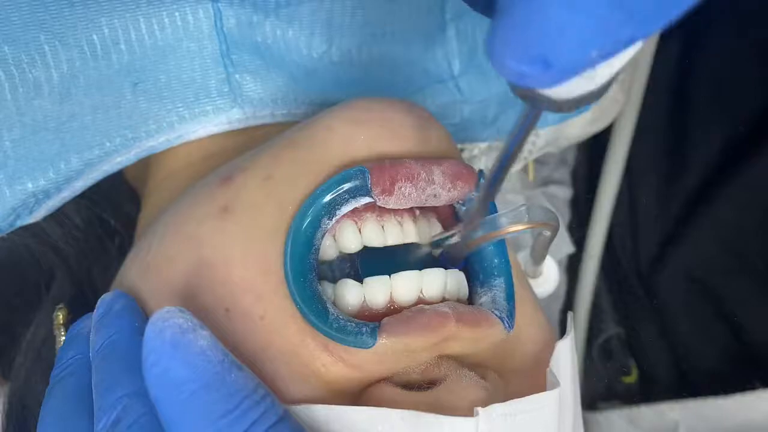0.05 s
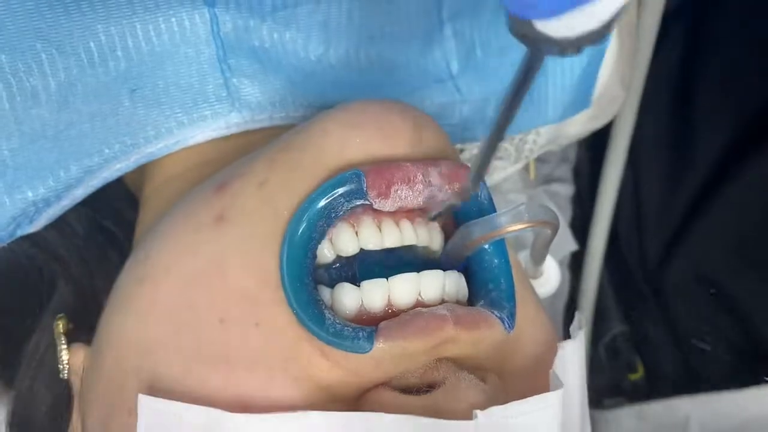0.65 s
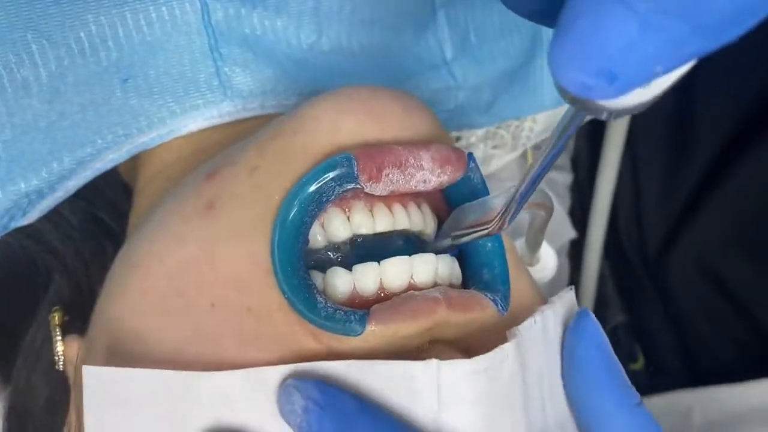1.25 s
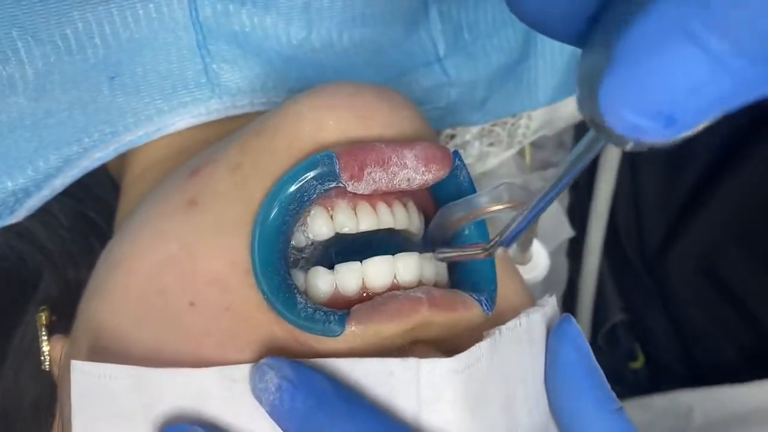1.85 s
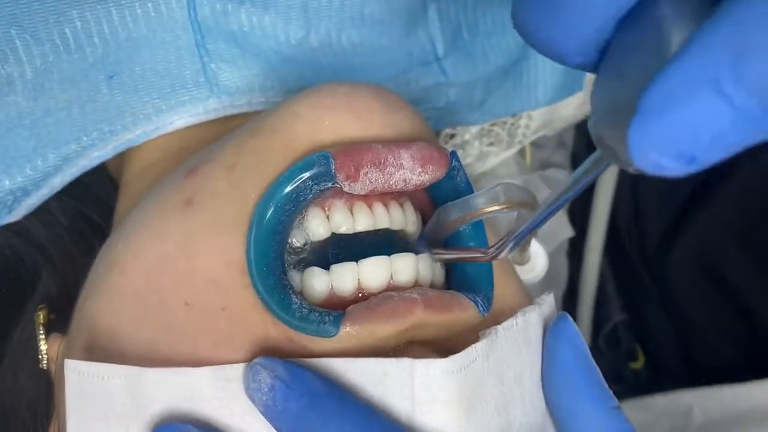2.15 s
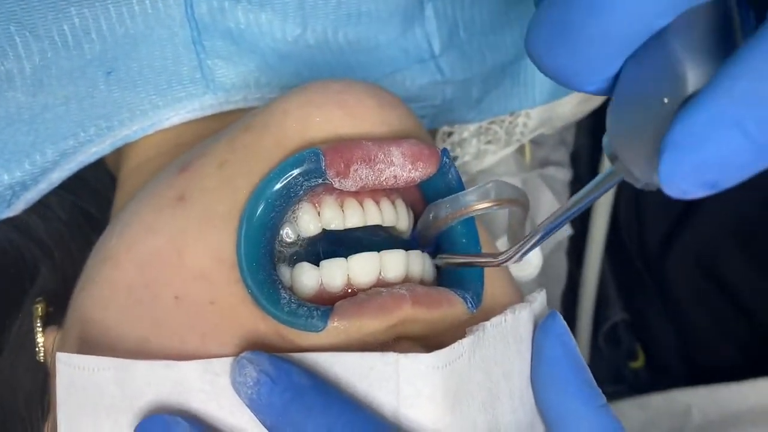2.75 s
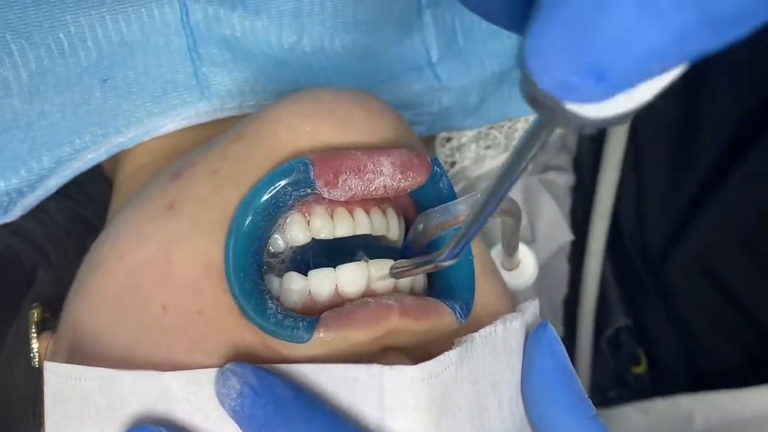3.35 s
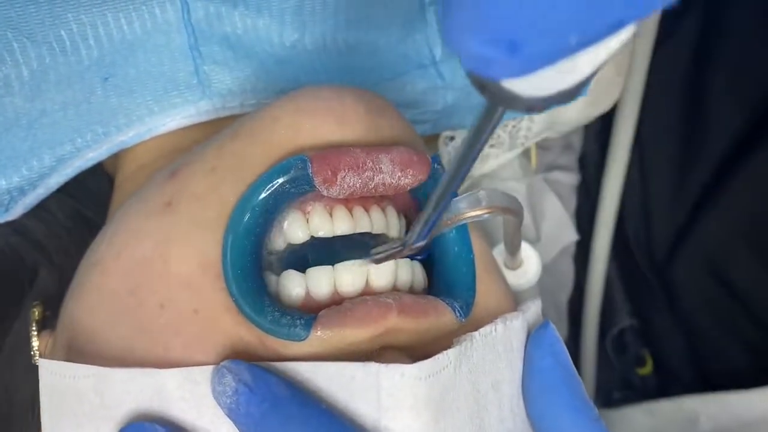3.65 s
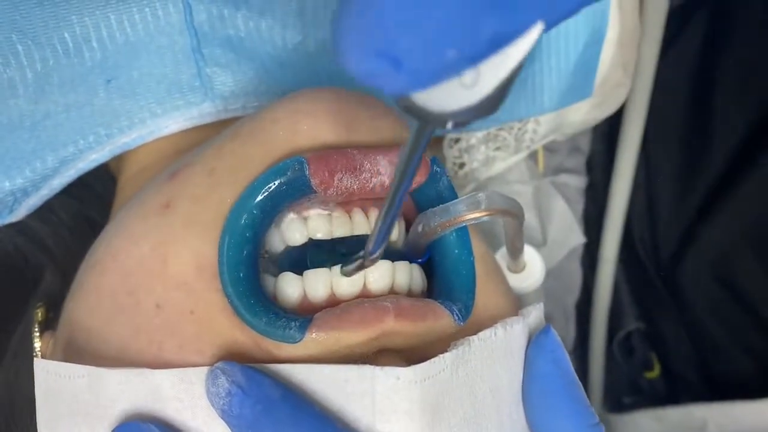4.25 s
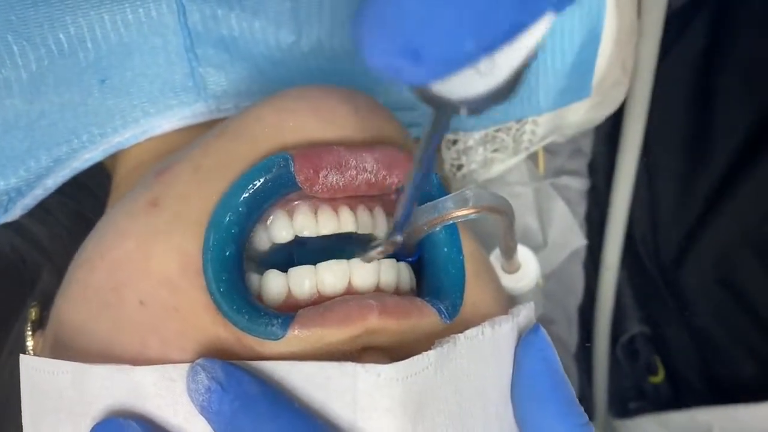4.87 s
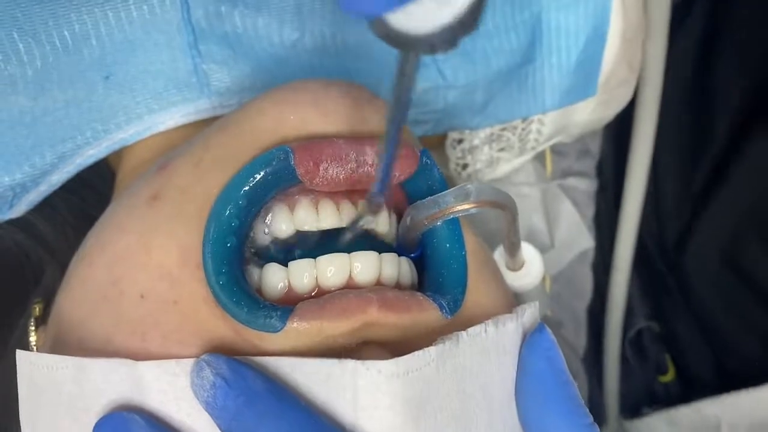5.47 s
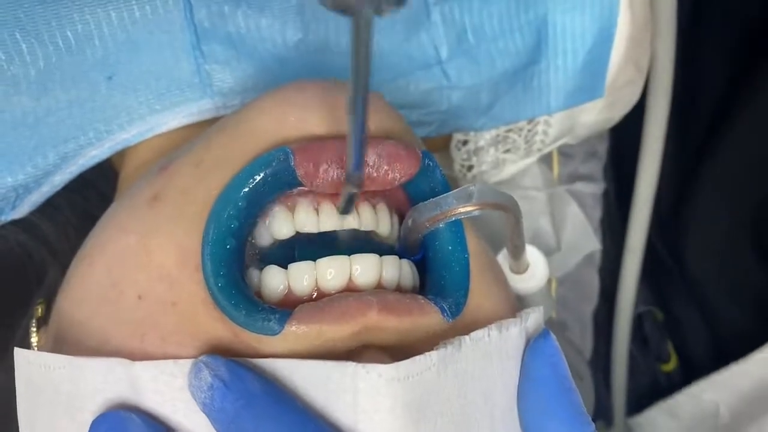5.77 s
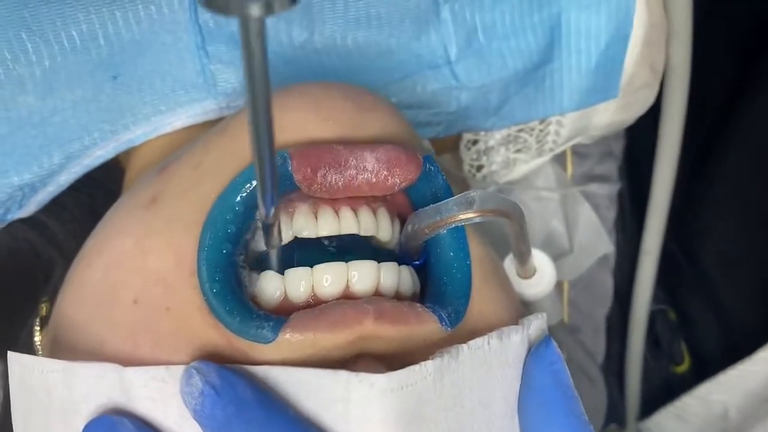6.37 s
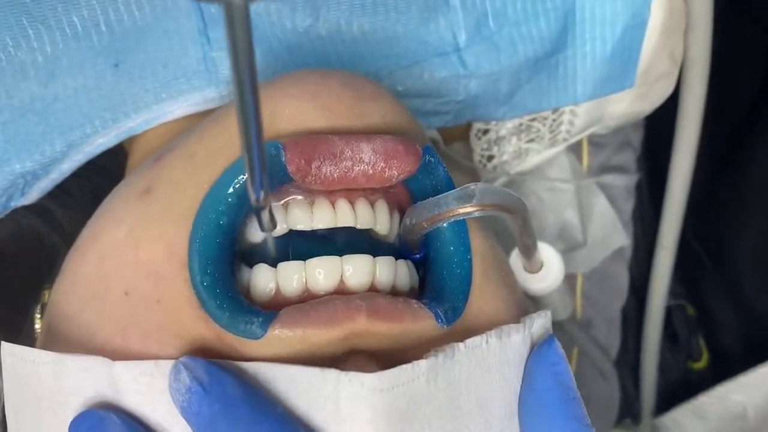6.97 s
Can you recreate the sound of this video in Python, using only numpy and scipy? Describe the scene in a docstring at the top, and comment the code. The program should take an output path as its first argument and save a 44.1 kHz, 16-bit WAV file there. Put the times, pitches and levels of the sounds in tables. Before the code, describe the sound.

Close, wet hissing and slurping of dental suction in an open mouth, with little spits and a low hum beneath.

```python
"""A hollow, watery rush is heard first: a dental suction tube slurps air and saliva in an open mouth,
close to a pair of microphones. Turbulent flow excites the resonances of mouth and tube; it dips as
liquid chokes the tip, swells as the tip draws freely, and pops and spits as slugs go through.
Beneath it a motor hums at harmonics of its shaft speed, over the low rumble of a quiet treatment room."""
import sys
import numpy as np
from scipy import signal
from scipy.fft import rfft, irfft
from scipy.io import wavfile
from scipy.ndimage import uniform_filter1d, minimum_filter1d

SR = 44100
rng = np.random.default_rng(int(sys.argv[2]) if len(sys.argv) > 2 else 0)


def generate_wav(signal):
    """Clip the signal to [-1, 1] and save it as 16-bit WAV at the path in sys.argv[1]."""
    frames = np.transpose(np.atleast_2d(signal))
    scaled = np.clip(frames, -1, 1) * 32767
    pcm = np.round(scaled).astype(np.int16)
    wavfile.write(sys.argv[1], SR, pcm)


N = 318402
T = np.arange(N) / SR
HZ = np.fft.rfftfreq(N, 1 / SR)

# Modes of mouth and tube, in the order deep, low, main, high, tip:
# (frequency [Hz], half-width [Hz], gain [dB])
CAVITY_MODES = [(1374, 107, -0.3), (1861, 305, -2), (2623, 406, -2.5), (3210, 470, -0.5), (5330, 1500, 0)]
# How strongly droplets and gulps shake each mode: (weight [ratio])
MODE_WETNESS = (1.5, 1.08, 0.82, 0.75, 0.32)
# How deeply the liquid film flutters each mode: (depth [dB])
MODE_FLUTTER = (2.2, 2.3, 1.0, 1.1, 0.3)
# How far each mode follows a squelch: (share [0-1])
MODE_SQUELCH = (1, 0.94, 0.6, 0.32, 0.2)
# Drive of the deep mode, at the back of the mouth: (time [s], level [dB])
DEEP_DRIVE = [(0.2, -43), (1.15, -45), (2.6, -40), (4.0, -41), (5.2, -35), (5.75, -30), (6.4, -36),
              (7.21, -31.5)]
# Strength of the suction as the tip is moved about: (time [s], level [dB])
SUCTION_DRIVE = [(0.19, -19), (0.57, -24), (0.85, -16), (1.15, -18), (1.9, -22.5), (2.42, -22.5),
                 (2.85, -23), (3.3, -20), (3.55, -18), (4.4, -20.5), (4.9, -17), (5.35, -17.5),
                 (5.63, -11.5), (6.25, -15), (6.55, -23.5), (6.85, -17.5), (7.21, -17)]
# Drive of the treble modes: (time [s], high mode level [dB], tip mode level [dB])
TREBLE_DRIVE = [(0.2, -50, -32.5), (0.45, -25.5, -37.5), (0.75, -22, -29), (1.05, -21.5, -33.5),
                (1.3, -38, -35), (1.55, -27.5, -39), (2.55, -24, -35), (2.85, -27.5, -39.5),
                (3.25, -21.5, -33.5), (3.55, -26.5, -41.5), (4.3, -31, -37.5), (4.95, -31.5, -33.5),
                (5.55, -33, -42.5), (6.25, -26, -35), (6.7, -26.5, -45), (7.0, -24.5, -68),
                (7.21, -16.5, -43)]
# Drive of the air hiss: (time [s], level [dB])
HISS_DRIVE = [(0.19, -32), (0.65, -31), (1.4, -36), (2.4, -36.5), (3.85, -37.5), (4.85, -34), (5.4, -35),
              (5.7, -29.5), (5.9, -33.5), (6.15, -31), (6.6, -36), (7.0, -32), (7.21, -35.5)]
# Air rushing past the tip: (frequency [Hz], relative density [dB])
HISS_SPECTRUM = [(200, -17), (600, -18), (1000, -2), (2000, -19), (4200, 1), (4900, -4), (6400, -3),
                 (7300, 2.5), (8400, 1.5), (9200, 2), (10000, 2.5), (12000, -1.5), (14000, -1),
                 (15500, -18)]
# The tip draws freely and the slurp swells: (time [s], rise [dB])
SURGES = [(0.25, 2), (1.235, 1.5), (1.57, 1), (1.765, 0), (2.58, 2.5), (3.205, 3), (4.07, 0), (4.54, 0),
          (5.29, 3.5), (6.19, 2), (6.39, 2.5), (6.97, 3.5)]
# Bubbles squelch through the tip, each a brief lurch of the slurp: (time [s], rise [dB])
SQUELCHES = [(0.246, 2), (0.306, 3), (0.425, 4), (0.486, 8), (0.533, 8), (1.755, 2.5), (1.796, 6),
             (1.932, -0.5), (2.015, 5), (2.905, 10), (3.295, 4.5), (4.36, 11), (4.548, 7), (4.908, 4),
             (5.293, 4), (6.611, 7.5), (6.852, 5), (6.944, 3)]
# Saliva plugs the tip:
# (time [s], half-length [s], slurp change [dB], hiss change [dB], added diffuse share [0-1])
CHOKES = [(1.838, 0.0098, -5, 2, 0.033), (1.88, 0.032, -2, 0, .3), (1.966, 0.04, -3.5, 2, 0),
          (3.003, 0.034, -4, 1.5, 0), (3.15, .025, -2.5, -1, 0), (3.252, 0.026, -4.5, -1, 0),
          (3.97, 0.013, -2.5, 2, 0.0047), (4.147, 0.0095, -8, 4, 0.24), (4.17, 0.015, 2, 4, 0.32),
          (4.234, 0.018, -3, -.5, 0), (5.366, 0.022, -5, 0, 0), (5.892, .012, -4, 0, 0.079),
          (6.688, 0.015, -7.5, -3, 0.35), (6.799, 0.023, -10, -3, 0), (6.895, 0.018, -6.5, -5, 0)]
# Slugs of saliva pop into the tube: (time [s], relative peak [dB], ring frequency [Hz])
SLUGS = [(0.416, -13, 2500), (0.424, -13, 2510), (0.696, -12, 3200), (0.714, -11, 3100), (1.241, -1, 2340),
         (1.385, -15, 2550), (1.548, -14, 2530), (1.775, -5, 2620), (1.86, -12, 2620), (1.929, -16, 2680),
         (2.097, -10, 2550), (2.111, -12, 2500), (2.235, -9, 2670), (2.46, -10.5, 2950), (2.593, -11, 2650),
         (3.2, -9, 3020), (3.782, -14, 2550), (3.915, -12, 2800), (4.036, -6, 2730), (4.165, -9, 2800),
         (5.173, -14, 2840), (5.32, -14, 2820), (5.401, -8, 2540), (5.48, -10, 2500), (6.371, -6, 3000),
         (6.392, -8, 2580), (6.715, -5, 3000), (6.75, -8, 2570), (6.798, -14, 2880), (6.822, -20, 2900),
         (6.971, -10, 2730), (7.101, -2, 2910)]
# Sharp spits of saliva: (time [s], envelope peak [dB])
SPITS = [(1.66, -33), (1.858, -29.5), (1.875, -35), (2.46, -45), (2.592, -32), (4.165, -36), (4.85, -28),
         (5.292, -32), (5.908, -28), (6.092, -25), (6.178, -32), (6.603, -27), (6.715, -36)]

# The hum fills out, then holds: (time [s], level [dB], fourth order level [dB], deep order level [dB])
HUM_DRIVE = [(0.19, -44.5, -44.5, -60), (0.55, -44.5, -56, -69), (0.85, -41, -42, -61),
             (1.35, -41.5, -42, -49), (3.1, -41.5, -42.5, -49), (5.3, -39.5, -40.5, -48),
             (7.21, -38.5, -40.5, -48)]
# Lowest shaft harmonics: (order [multiple of shaft speed], gain [dB])
DEEP_ORDERS = [(2, -3), (3, -4.5)]
# Upper shaft harmonics: (order [multiple of shaft speed], gain [dB])
UPPER_ORDERS = [(5, -17), (6, -3), (7, -20), (9, -14.5), (11, -15), (14, -16.5), (15, -15), (16, -22),
                (18, -19), (19, -13.5)]
# Harmonics that beat against a second rotor: (order [multiple], gain [dB], signed depth [ratio])
BEATING_ORDERS = [(8, -5.5, 0.89), (10, -12.5, -.8)]
# Rumble of the room: (frequency [Hz], relative density [dB])
RUMBLE_SPECTRUM = [(15, -31), (35, -20), (55, -7), (110, -1.5), (200, 1), (260, 1.5), (340, -3.5),
                   (480, -6.5), (700, -8), (1500, -23)]
# Soft low bumps: (time [s], envelope peak [dB])
BUMPS = [(2.25, -45), (2.45, -43), (2.82, -41), (2.9, -44), (3.51, -44), (5.41, -42)]

# The stereo image: (frequency [Hz], left over right [dB], left phase lead [rad], coherence [0-1])
STEREO_IMAGE = [(80, 0, 0.31, 0.98), (200, 4.5, 0.61, 0.84), (322, 0, 0.27, 0.68), (503, 1, -1.6, 0.4),
                (814, -5.5, -1.2, 0.37), (1005, -1, -3, 0.99), (1176, -16, 1.5, 0.2),
                (1220, -4.5, -0.74, 0.5), (1514, 1, -3.5, 1), (1627, -1.5, 1, 0.6),
                (1700, -1.5, -0.04, 0.5), (1997, 2, -1.4, 0.43), (2059, 0, -3, 1), (2350, -2.5, 3, .999),
                (2480, 2, 3.5, 1), (2750, 1.2, 3, 0.97), (2918, 0, 1.07, 0.5), (3260, -5.5, 0.5, 0.47),
                (3450, -18, 1.5, 0.16), (3670, -11.5, 0.5, 0.6), (4050, -11.5, 0.3, 0.05),
                (4700, -3.5, 1.2, 0.14), (4960, 2, 1, 0.2), (5180, -3, 1, 0.8), (5620, -3, -1.5, .45),
                (6050, -10, -1.5, 0.1), (6540, -3, 0.5, 0.5), (7220, -3, .3, 0.87), (7450, -2, 1.6, 0.9),
                (7870, 3, 3, 1), (8060, 6, 4.5, 0.87), (9590, -2, 3.5, 0.78), (9700, 1, -0.6, 1),
                (10550, -0.5, 2.04, 0), (11800, 0, -1, 1), (12100, 1.5, -0.5, 0.4), (12800, -2, -1.5, 0.1),
                (13300, 0.5, 1.2, 0.5), (14400, 0, 2, 1)]
# Bands where left and right are set in opposite phase, sounding very wide: (centre [Hz], half-width [Hz])
ANTIPHASE_BANDS = [(2375, 253), (8750, 856)]
# Drift of the stereo image near 2.3 kHz, and of a hollow in the treble:
# (time [s], image shift [Hz], diffuse share [0-1], hollow centre [Hz], hollow gain [dB])
IMAGE_AND_HOLLOW = [(0.2, 228, 0.012, 3420, -11), (0.55, 124, 0, 3100, -3.5), (1.4, 0, 0.00076, 4270, 3),
                    (2.7, -20, 0, 5550, -4), (3.3, 2, 0, 5830, -8), (3.5, -7, 0, 5080, -9),
                    (4.6, -16, 0, 4670, -8.5), (5.0, 4, 0.0008, 4370, -10), (5.45, 21, 0, 4530, -7),
                    (5.65, 51, 0.29, 4500, -8), (5.92, 42, 0.0067, 4420, -17), (6.1, -77, 0, 4580, -15),
                    (6.35, -85, 0, 4500, -9), (6.62, -110, 0, 4850, -13), (7.21, -110, 0, 4480, -5)]
# Watery flicker of narrow bands: (frequency [Hz], depth [dB])
FLICKER_DEPTH = [(900, 0.8), (1700, 1.6), (3200, 2.9), (4600, 4.6), (6800, 4.4), (10500, 2.7)]
# Standing-wave peaks and notches: (centre [Hz], half-width [Hz], left gain [dB], right gain [dB])
STANDING_WAVES = [(1110, 160, -5, -3), (1520, 58, -5, -7.5), (2835, 65, 2, 2), (2943, 41, -0.5, -2.5),
                  (3035, 77, -2.5, 2), (3380, 72, -11, -0.5), (3640, 92, 5, 2), (3854, 70, -6, -6),
                  (4246, 72, -1, 2.5), (4505, 70, 0, -9), (4750, 58, 3, 3.5), (4930, 91, -8.5, -3),
                  (5350, 130, -2.5, -4.5), (5700, 100, 0, 1), (6010, 110, -2, -5), (6260, 100, 2, 3),
                  (6620, 120, -8, -6.5)]
# A mouth resonance that moves with the tool, like a vowel: (time [s], centre [Hz], gain [dB])
FORMANT = [(0.2, 5650, 4), (0.45, 5200, 2.5), (0.8, 5700, 0), (1.4, 5600, 0), (2.4, 4900, 2.5),
           (2.9, 4730, -0.5), (3.25, 4700, 4.5), (3.6, 4350, 0), (3.8, 5600, 3.5), (4.5, 5700, -2),
           (4.95, 6000, 5), (5.3, 5250, 2), (5.7, 5800, 4.5), (6.25, 5950, 5), (6.6, 5740, 1),
           (7.21, 5350, -1.5)]

FRAME = 2048  # samples per short-time spectrum


def gain_of(db):
    """Amplitude ratio of a level in decibels."""
    return 10 ** (np.asarray(db) / 20)


def unit_rms(x):
    """Normalisation to unit mean power."""
    return x / np.sqrt(np.mean(x ** 2) + 1e-20)


def bell(x, centre, width):
    """A Gaussian of height 1."""
    return np.exp(-((x - centre) / width) ** 2)


def over_time(rows, t=T):
    """Linear interpolation of each column in time."""
    times, *columns = np.transpose(rows)
    return [np.interp(t, times, column) for column in columns]


def over_frequency(rows, hz=HZ):
    """Interpolation of each column in log frequency."""
    knots_hz, *columns = np.transpose(rows)
    return [np.interp(np.log(abs(hz) + 1), np.log(knots_hz + 1), column) for column in columns]


def noise():
    """Two uncorrelated streams of white noise."""
    return rng.standard_normal((2, N))


def filtered(x, gain):
    """Filtering as multiplication of the spectrum."""
    return irfft(rfft(x) * gain, N)


def resonance(hz, width_hz):
    """A Lorentzian peak of height 1."""
    return 1 / (1 + ((HZ - hz) / width_hz) ** 2)


def wobble(rate_hz, width_hz):
    """Narrow-band random motion of rms 1."""
    return unit_rms(filtered(rng.standard_normal(N), resonance(rate_hz, width_hz)))


def patches(hz, t, width_hz, length_s):
    """A random field of rms 1, correlated over frequency and time by Gaussian smoothing."""
    kernel = bell(hz[:33], hz[16], width_hz) * bell(t[:33], t[16], length_s)
    return unit_rms(signal.fftconvolve(rng.standard_normal((len(hz), len(t))), kernel, "same"))


def bursts(rows, rise_s, decay_s):
    """Superposed envelopes, each with an exponential rise and decay."""
    out, age = np.zeros(N), np.arange(SR // 4) / SR
    shape = (1 - np.exp(-age / rise_s)) * np.exp(-age / decay_s)
    for s, db in rows:
        part = out[round(s * SR):][:len(age)]
        part += gain_of(db) * shape[:len(part)] / shape.max()
    return out


def droplets(per_s, spread_db, decay_s):
    """Shot-noise envelope: droplets tear off the tip at random and their powers add."""
    sizes = gain_of(spread_db * np.clip(rng.standard_normal(N), -2, 2))
    torn_off = rng.random(N) < per_s / SR
    power = signal.lfilter([1], [1, -np.exp(-2 / (decay_s * SR))], (sizes * torn_off) ** 2)
    return unit_rms(np.sqrt(power))


def wet_flow(drops, share, swing_db):
    """Amplitude modulation of a flow in which smooth air and a share of droplets add in power."""
    return unit_rms(np.sqrt(1 - share + share * drops ** 2) * gain_of(swing_db))


def slurp(drops, gulp, flutter, surge_db):
    """Forced resonance: choked, spattering air flow drives the modes of mouth and tube."""
    (deep_db,), (main_db,) = over_time(DEEP_DRIVE), over_time(SUCTION_DRIVE)
    low_db = -28.5 + 0.3 * (main_db + 18.5)  # the low mode follows the suction only in part
    drives_db = (deep_db, low_db, main_db, *over_time(TREBLE_DRIVE))
    choke_db = sum(db * bell(T, s, length) for s, length, db, _, _ in CHOKES)
    squelch_db = sum(db * bell(T, s, 0.0068) for s, db in SQUELCHES)
    modes = zip(CAVITY_MODES, MODE_WETNESS, MODE_FLUTTER, MODE_SQUELCH, drives_db)
    out = np.zeros((2, N))
    for (hz, width_hz, mode_db), wet, flutter_db, lurch, drive_db in modes:
        flow = wet_flow(drops, share=0.6 * wet, swing_db=0.88 * wet * gulp + flutter_db * flutter)
        level_db = drive_db + mode_db + surge_db + choke_db + lurch * squelch_db
        out += filtered(flow * gain_of(level_db) * noise(), unit_rms(resonance(hz, width_hz)))
    return out


def hiss(drops, gulp, flutter, surge_db):
    """Turbulence at the tip radiates broadband noise; spray from slugs and spits adds to its power."""
    choke_db = sum(db * bell(T, s, length) for s, length, _, db, _ in CHOKES)
    level_db = over_time(HISS_DRIVE)[0] + 0.58 * surge_db + choke_db + 0.5
    air = gain_of(level_db) * wet_flow(drops, share=0.26, swing_db=0.55 * gulp + 0.25 * flutter)
    spray = bursts([(s, db - 18.5) for s, db, _ in SLUGS], rise_s=0.0005, decay_s=0.0014)
    spray += bursts(SPITS, rise_s=0.0013, decay_s=0.0097)
    spectrum = unit_rms(gain_of(over_frequency(HISS_SPECTRUM)[0]))
    return filtered(np.hypot(air, spray) * noise(), spectrum)


def suction():
    """Two-phase flow: one stream of air and saliva modulates both slurp and hiss."""
    surge_db = sum(db * bell(T, s, 0.039) for s, db in SURGES)
    drops = droplets(per_s=450, spread_db=2.5, decay_s=0.0015)
    # the liquid can choke the flow deeply, but the pump limits each swell
    gulp = np.minimum(wobble(rate_hz=4.9, width_hz=3.5), 1.3)
    flutter = np.minimum(wobble(rate_hz=27.5, width_hz=19.0), 1.3)
    return slurp(drops, gulp, flutter, surge_db) + hiss(drops, gulp, flutter, surge_db)


def motor(shaft_hz, beat_hz):
    """A wavering shaft sounds a harmonic series; two orders beat by interference with a second rotor."""
    hum_db, fourth_db, deep_db = over_time(HUM_DRIVE)
    speed_hz = shaft_hz * (1 + 0.00248 * wobble(rate_hz=0.46, width_hz=1.06))
    angle = 2 * np.pi * np.cumsum(speed_hz) / SR
    beat = np.exp(2j * np.pi * beat_hz * (T - 0.0012))

    def harmonic(order, db):
        """A phasor locked to the shaft, with a random starting phase."""
        return np.sqrt(2) * gain_of(db) * np.exp(1j * (order * angle + 2 * np.pi * rng.random()))

    out = harmonic(4, fourth_db - 0.5)
    out += sum(harmonic(k, db + deep_db) for k, db in DEEP_ORDERS)
    out += sum(harmonic(k, db + hum_db) for k, db in UPPER_ORDERS)
    out += sum(harmonic(k, db + hum_db) * (1 - depth * beat) for k, db, depth in BEATING_ORDERS)
    return out.real


def room():
    """Modulated low-frequency noise: a rumble that follows the hum, and a few soft bumps."""
    rumble = unit_rms(filtered(noise(), gain_of(over_frequency(RUMBLE_SPECTRUM)[0])))
    rumble *= gain_of(over_time(HUM_DRIVE)[0] - 3.0)
    thud = unit_rms(filtered(noise(), resonance(hz=90, width_hz=130) ** 2))
    return rumble + thud * bursts(BUMPS, rise_s=0.018, decay_s=0.045)


def slug_pops(rise_s, decay_s, gain_db):
    """Damped free oscillation: each slug knocks the cavity once and it rings for a few cycles."""
    out, age = np.zeros(N), np.arange(SR // 50) / SR
    shape = (1 - np.exp(-age / rise_s)) ** 2 * np.exp(-age / decay_s)
    for s, db, hz in SLUGS:
        ring = gain_of(db + gain_db) * shape / shape.max() * np.sin(2 * np.pi * hz * age)
        part = out[round(s * SR):][:len(age)]
        part += ring[:len(part)]
    return out


def flicker(hz, t):
    """Random modulation of narrow bands, at constant mean power, makes the rush watery."""
    swing = np.minimum(patches(hz, t, width_hz=90, length_s=0.036), 1.5)
    gain = gain_of(over_frequency(FLICKER_DEPTH, hz)[0] * swing)
    return gain / np.sqrt(np.mean(gain ** 2, axis=1, keepdims=True))


def stereo_spread(hz, t, shared, apart):
    """Partial coherence: two streams mix into left and right, with level and phase set by band."""
    shift_hz, diffuse, _, _ = over_time(IMAGE_AND_HOLLOW, t)
    diffuse += sum(share * bell(t, s, length) for s, length, _, _, share in CHOKES)
    diffuse = np.clip(diffuse * bell(hz, centre=2400, width=1800), 0, 1)
    shifted_hz = hz - shift_hz * bell(hz, centre=2250, width=540)
    image = np.array(STEREO_IMAGE)
    image[:, 2] = np.unwrap(image[:, 2])
    balance_db, lead, coherence = over_frequency(image, shifted_hz)
    coherence = np.clip(coherence, 0, 1) * (1 - diffuse)
    mid, side = shared * np.sqrt(1 + coherence), apart * np.sqrt(1 - coherence)
    left = gain_of(balance_db) * np.exp(1j * lead) * (mid + side) * flicker(hz, t)
    right = (mid - side) * flicker(hz, t)
    pair = np.array([left, right]) / np.hypot(1, gain_of(balance_db))
    # removing what both sides share leaves a band in opposite phase
    antiphase = sum(1 / (1 + ((shifted_hz - centre) / width) ** 12) for centre, width in ANTIPHASE_BANDS)
    return pair - pair.mean(0) * antiphase * (1 - np.sqrt(diffuse))


def mouth_response(hz, t):
    """Standing waves ripple the gain, a formant lifts one band, a reflection off the teeth cuts one."""
    _, _, hollow_hz, hollow_db = over_time(IMAGE_AND_HOLLOW, t)
    formant_hz, formant_db = over_time(FORMANT, t)
    moving_db = hollow_db * bell(hz, hollow_hz, 340) + formant_db * bell(hz, formant_hz, 330)
    drift = 0.0054 * np.interp(t, T, wobble(rate_hz=0.34, width_hz=0.81))  # the hand moves
    still_db = sum(np.outer(sides, bell(hz, centre, width)) for centre, width, *sides in STANDING_WAVES)
    ripple_db = np.array([np.interp(hz * (1 + drift), hz[:, 0], side) for side in still_db])
    # thin whistly bands come and go
    whistles = np.minimum(patches(hz, t, width_hz=25.4, length_s=0.19), 1.8) - 0.25
    whistle_db = 4.0 * np.interp(hz, [400, 1400, 4500], [0, 0.35, 1]) * whistles
    return gain_of(ripple_db + whistle_db + moving_db)


def limiter(x, ceiling):
    """Peak limiting: the gain falls for a moment around any peak above the ceiling."""
    gain = np.minimum(1, ceiling / (abs(x).max(axis=0) + 1e-9))
    return x * uniform_filter1d(minimum_filter1d(gain, size=129), size=129)


def scene():
    """Superposition: suction, motor, room and pops, spread in stereo and filtered by the mouth."""
    hum = motor(shaft_hz=24.34, beat_hz=2.5)
    pops = slug_pops(rise_s=0.00036, decay_s=0.00081, gain_db=3.5)
    streams = suction() + room()
    streams[0] += hum + pops  # these feed only the shared stream
    hz, t, (shared, apart) = signal.stft(streams, SR, nperseg=FRAME)
    hz = hz[:, None]
    spectra = stereo_spread(hz, t, shared, apart) * mouth_response(hz, t)
    return signal.istft(spectra, SR, nperseg=FRAME)[1][:, :N]


def record(dry):
    """Gating and band limiting: a 2 ms onset, then a bass cut, the limiter and a treble cut."""
    gate = np.clip((T - 0.187) / 0.002, 0, 1)
    low_cut = signal.butter(4, 36, "highpass", fs=SR, output="sos")
    high_cut = signal.firwin(511, 15750, window=("kaiser", 9), fs=SR)
    limited = limiter(signal.sosfilt(low_cut, dry * gate), ceiling=0.72)
    return signal.oaconvolve(limited, high_cut[None], "same")


dry = scene()
out = record(dry)
generate_wav(out)
```